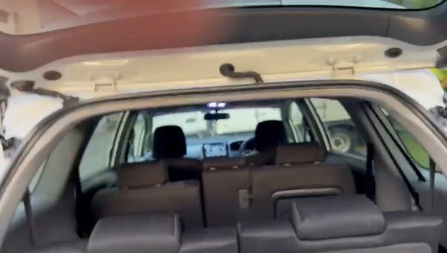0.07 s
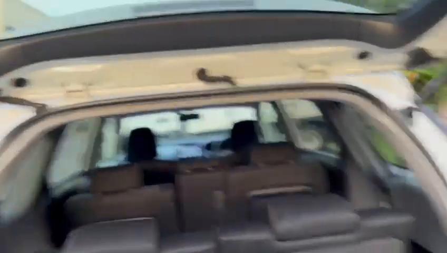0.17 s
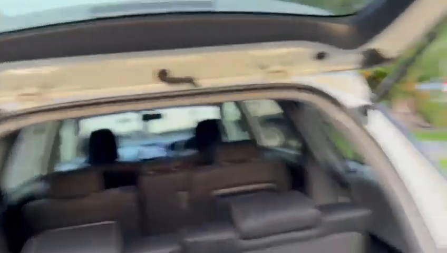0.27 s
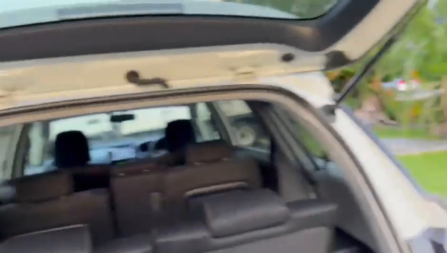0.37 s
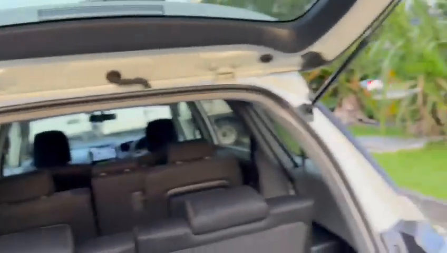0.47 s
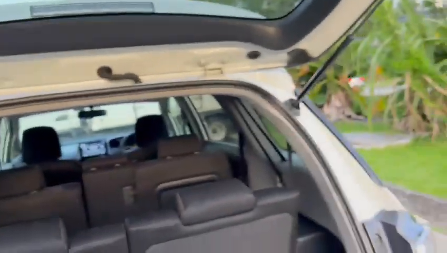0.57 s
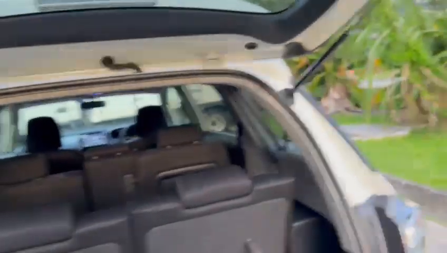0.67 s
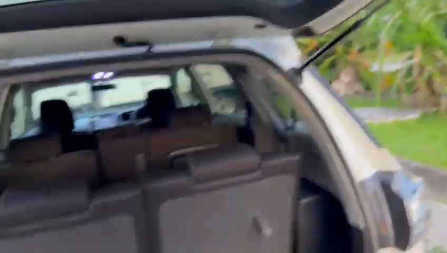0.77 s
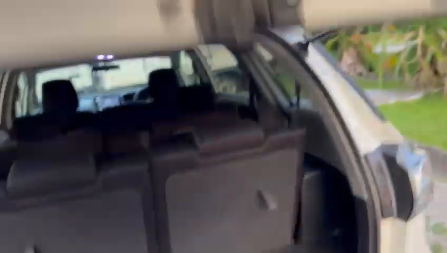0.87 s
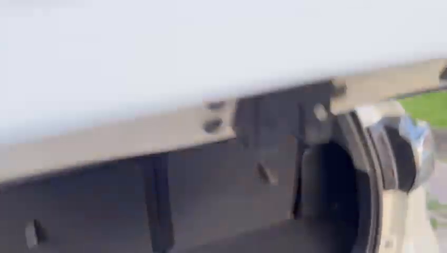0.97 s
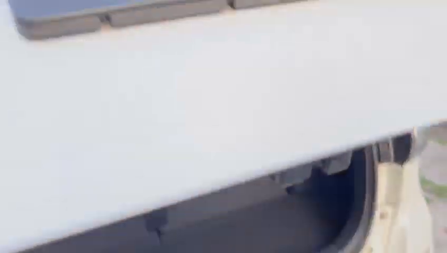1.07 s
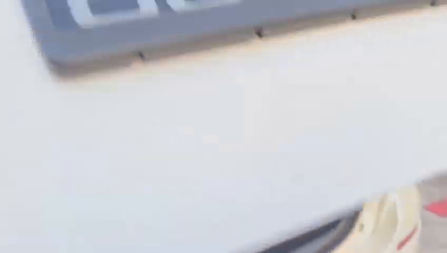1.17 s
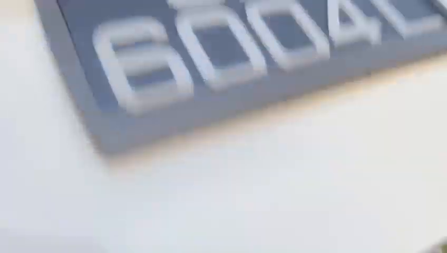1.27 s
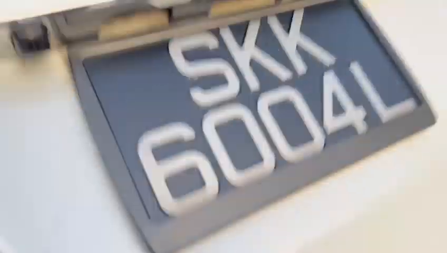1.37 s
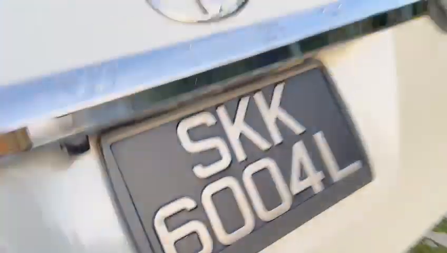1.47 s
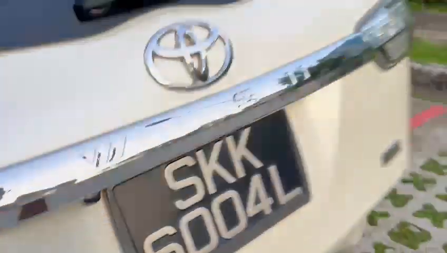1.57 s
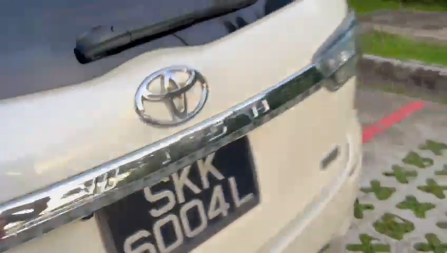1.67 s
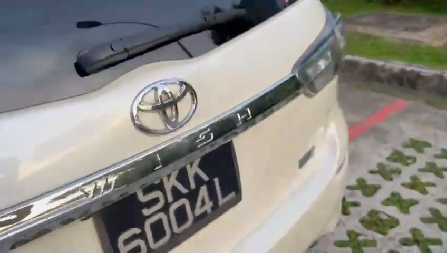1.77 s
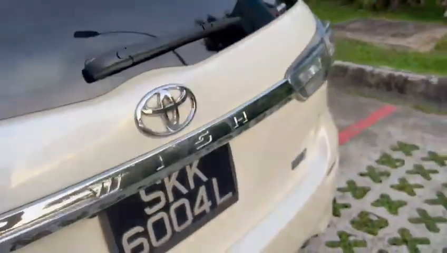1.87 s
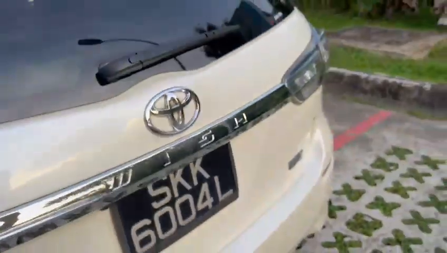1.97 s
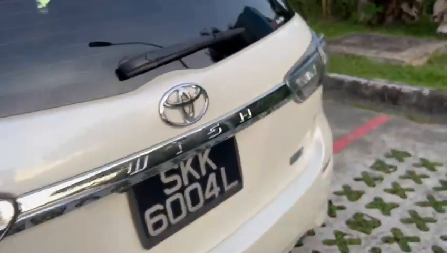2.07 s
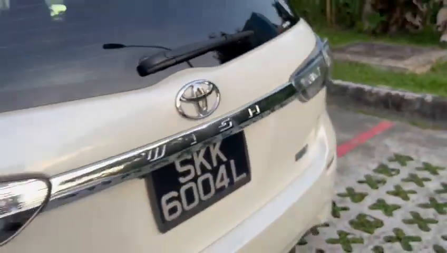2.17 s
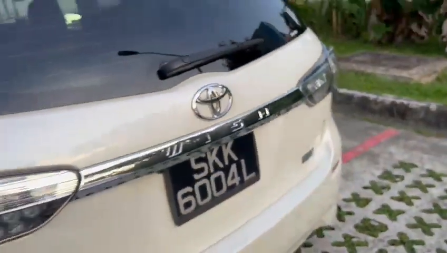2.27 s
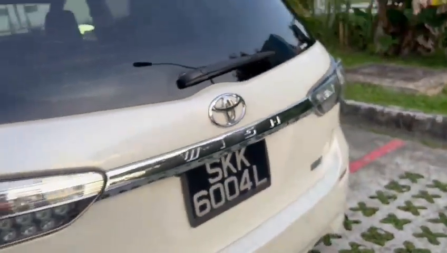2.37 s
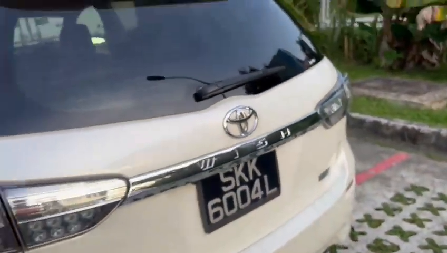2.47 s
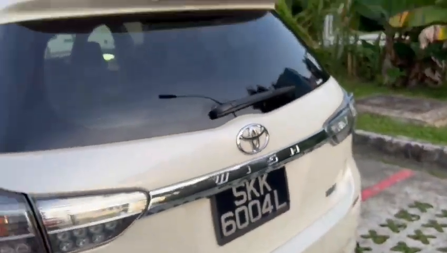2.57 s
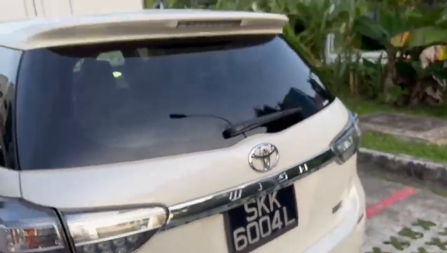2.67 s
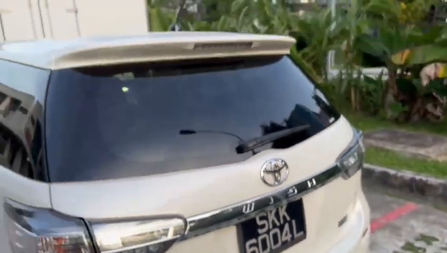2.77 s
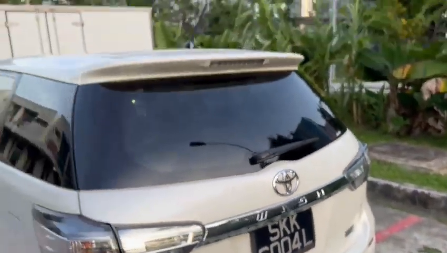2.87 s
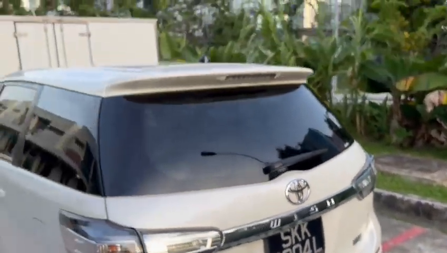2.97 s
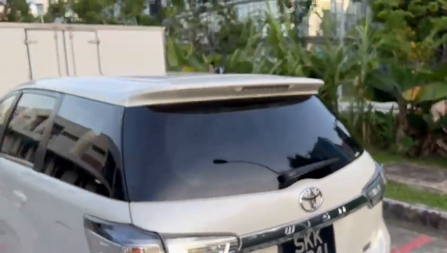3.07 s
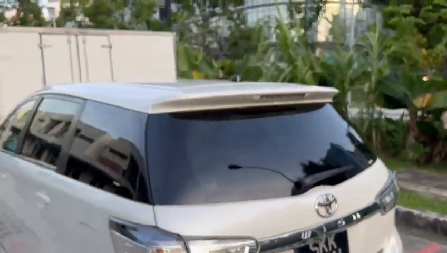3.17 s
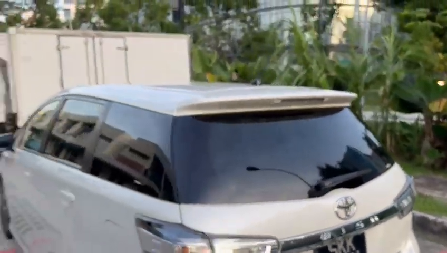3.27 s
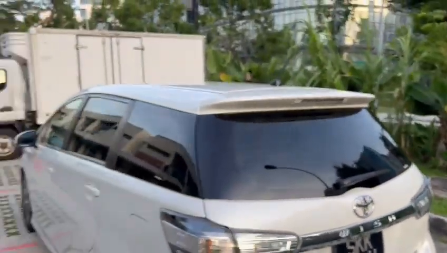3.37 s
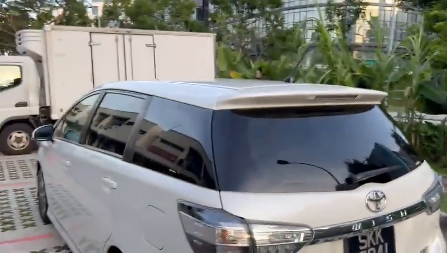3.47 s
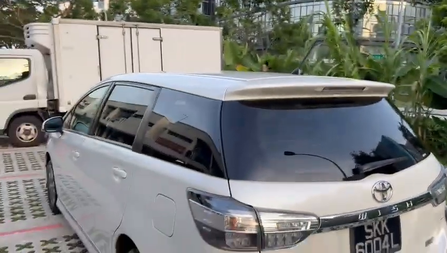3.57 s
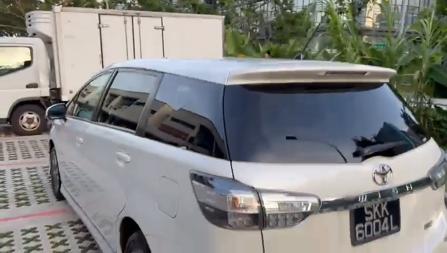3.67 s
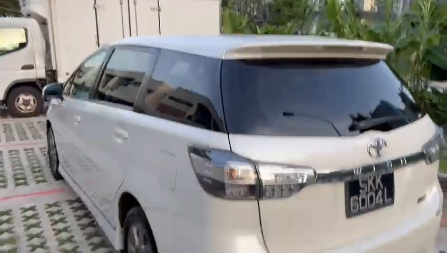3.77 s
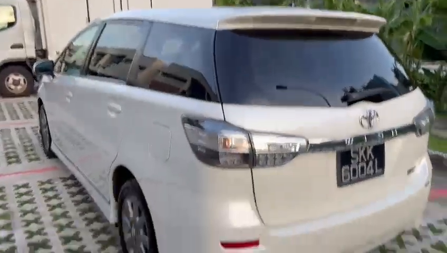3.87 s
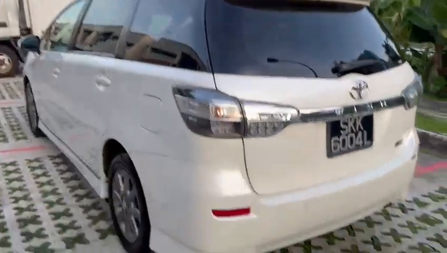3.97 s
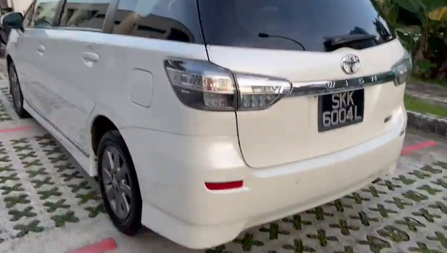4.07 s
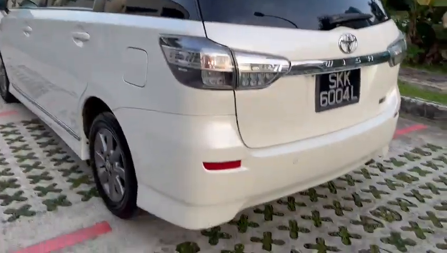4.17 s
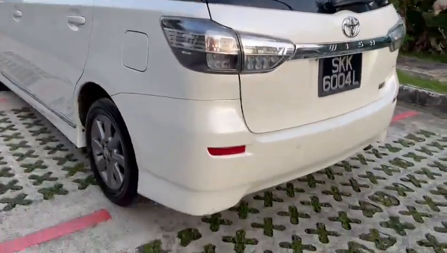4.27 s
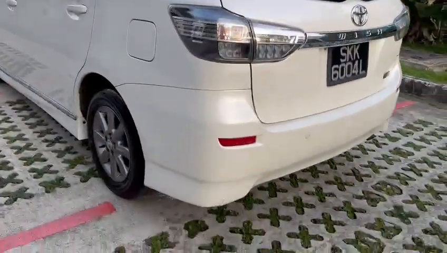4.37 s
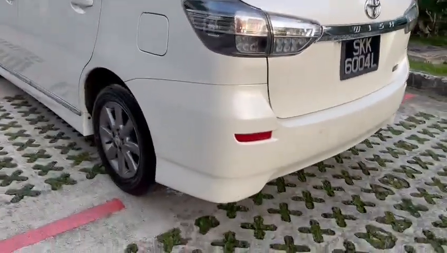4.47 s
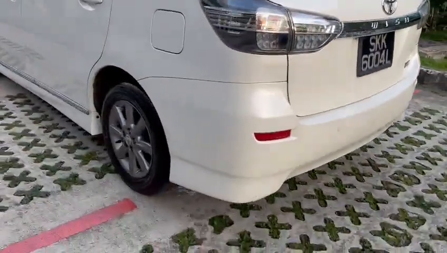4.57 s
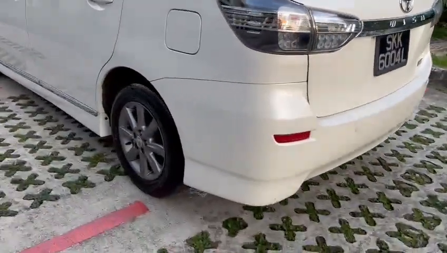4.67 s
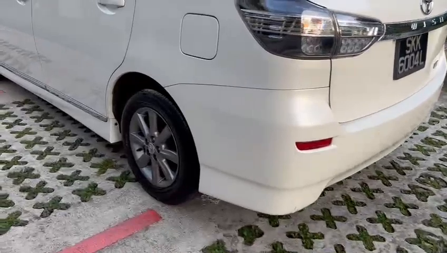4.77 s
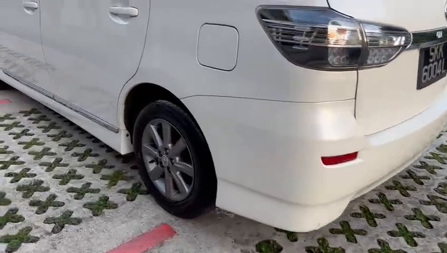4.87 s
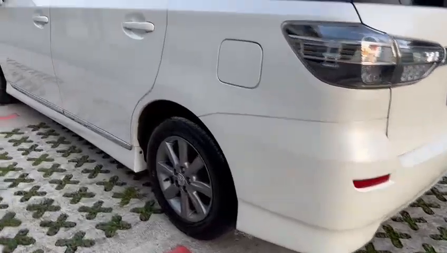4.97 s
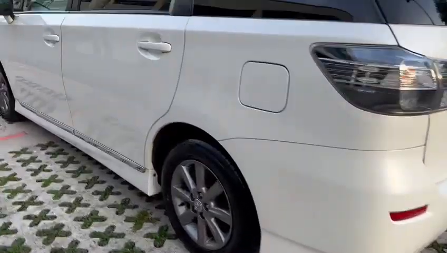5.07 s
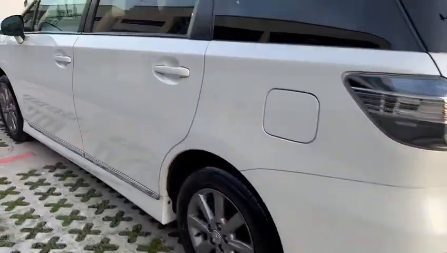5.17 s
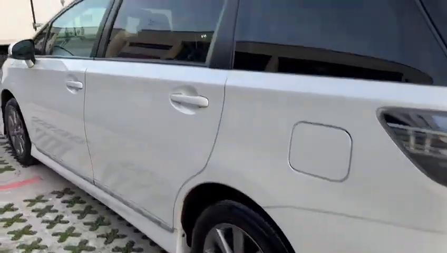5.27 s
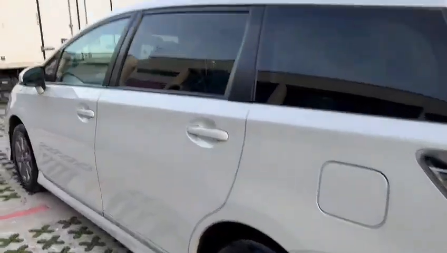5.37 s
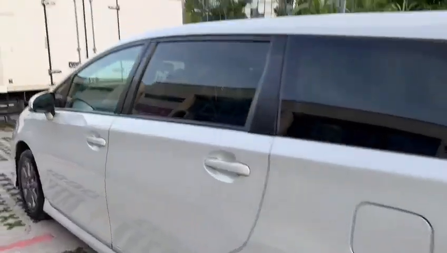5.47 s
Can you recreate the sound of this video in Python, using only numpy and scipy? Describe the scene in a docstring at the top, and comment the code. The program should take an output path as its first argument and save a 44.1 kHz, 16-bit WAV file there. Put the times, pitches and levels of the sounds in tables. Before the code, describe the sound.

Outdoors over distant traffic and idling machinery, handling clicks and a faint strut hiss lead to a heavy, rattling car hatch slam.

```python
"""In an open car park a low rough tone sinks away over distant traffic and the wavering hum of idling machinery.
Sleeve rustle (noise in strokes), small clicks (damped knocks) and soft bumps come from someone with the microphone.
A car's rear hatch is pulled down on whispering gas struts (gliding narrow noise and a high hiss), then slammed:
latch contacts ring the panel modes, noise shudders and clatters, a trim part bounces, cabin air booms.
The listener steps away meanwhile; clicks and bumps go on, and near the end a faint far tone whistles briefly."""
import sys
import numpy as np
from scipy import signal
from scipy.fft import rfft, irfft
from scipy.io import wavfile
from scipy.ndimage import uniform_filter1d

SR = 44100
rng = np.random.default_rng(int(sys.argv[2]) if len(sys.argv) > 2 else 0)


def wav_record(signal):
    """Record a signal, one row per channel, as 16-bit PCM in the file named by sys.argv[1]."""
    frames = np.transpose(np.atleast_2d(signal))
    bounded = np.clip(frames, -1, 1)
    # unit amplitude maps onto the largest positive 16-bit level
    quanta = np.round(bounded * 32767).astype(np.int16)
    wavfile.write(sys.argv[1], SR, quanta)


N = 243873

# Surroundings. Low rumble of the distance. Each row: time in seconds, level in dB.
RUMBLE_LEVEL = [(0, -35), (.85, -35), (1.15, -31.5), (2.0, -32), (2.96, -32.5), (3.3, -37.5), (3.67, -33.5),
                (4.2, -35.5), (5.53, -36)]
# Spectrum of the outdoor air sound. Each row: frequency in Hz, relative density in dB per Hz.
AIR_COLOUR = [(15, -49), (25, -10), (75, -1), (129, -5), (213, -9.5), (273, -10.5), (460, -19), (996, -24),
              (1450, -29), (2160, -34), (3290, -41.5), (6450, -45.5), (7870, -48.5), (8690, -51),
              (9600, -65.5), (12500, -113), (21100, -120)]
# Idling machinery. Each row: frequency in Hz, wander width in Hz, level in dB at the open hatch,
# level in dB out beside the car.
HUM_TONES = [(70, 4, -43, -43), (97.26, 2.78, -39.5, -37), (137, 2.23, -47.5, -36), (195.2, 4.87, -46, -49),
             (263.8, 1.12, -52, -45), (338.2, 2.3, -45.5, -52)]
# Microphone pair, diffuse sounds. Each row: frequency in Hz, left-right likeness 0-1, left over right in dB.
FAR_PAIR = [(60, 0.96, 2), (263, 0.83, 1.5), (430, 0.64, 2), (736, 0.2, 1.5), (1440, 0, -0.5),
            (2360, 0.39, -0.5), (3700, 0.22, 1.5), (4600, 0.32, 2), (6960, 0.34, 3), (8700, 0.3, -0.5)]
# Microphone pair, near sounds: the hatch and the rubbing of sleeve and hand. Each row: frequency in Hz, left-
# right likeness 0-1, left over right in dB, phase lead of the left in radians.
NEAR_PAIR = [(60, .99, 1, 0), (260, .94, 2.5, .2), (670, .7, 6, .6), (1150, .75, 5, .7), (1640, .7, 1, 3.3),
             (1980, .78, 1, 5.5), (2400, .65, 2, 6.9), (4500, .55, 3.5, 6.9), (6000, .2, 2, 7.5),
             (9000, .45, 1, 6.2)]
# Strokes of sleeve and hand. Each row: peak time in seconds, swell in seconds, fade in seconds,
# hiss level in dB, dull rubbing level in dB.
STROKES = [(.144, 0.037, 0.099, -54, -40.5), (.5, 0.065, 0.019, -80, -39), (.638, 0.14, 0.047, -57.5, -40),
           (.87, 0.26, 0.24, -60.5, -45), (1.045, 0.078, 0.12, -49, -34.5),
           (1.069, 0.026, 0.011, -41.5, -37), (1.33, 0.24, 0.17, -77, -59), (1.68, 0.08, 0.2, -61, -46)]
# Spectrum of cloth hiss. Each row: frequency in Hz, relative density in dB per Hz.
RUSTLE_COLOUR = [(1470, -32), (2500, -24), (2780, -10), (3990, -15.5), (5420, -9.5), (8930, -4),
                 (9740, -31), (10100, -71), (10800, -17), (11500, 9), (12300, -24), (16000, -58),
                 (22000, -120)]
# Small clicks and taps. Each row: start in seconds, knock level in dB, pitch in Hz, bright part level in dB,
# left over right in dB.
CLICKS = [(0.151, -35.5, 1360, -58, 14), (.386, -36, 1100, -63, -2), (0.483, -33, 2225, -37.5, 2),
          (0.484, -36, 1500, -46, 2), (0.485, -31, 1010, -50, 5), (0.492, -32, 840, -55, 6),
          (.494, -32, 490, -50, 2), (0.630, -37, 1100, -46, -3), (0.642, -36, 1046, -42.5, 1),
          (0.853, -28, 1250, -50, -1), (0.854, -26, 980, -55, -2), (0.855, -31, 720, -60, -1),
          (.985, -37, 1100, -60, -2), (1.019, -22.5, 400, -51, -3), (1.028, -22, 330, -60, 6),
          (1.040, -18, 390, -44, 4), (1.042, -40, 1950, -55, 2), (1.044, -28, 910, -61, 6),
          (1.068, -30, 334, -61, -2), (1.082, -29, 450, -63, 0), (1.094, -27, 380, -63, 4),
          (1.108, -30, 480, -65, 0), (1.578, -31, 775, -62, -2), (1.580, -33, 1010, -62, -5),
          (1.630, -49, 4500, -44, 3), (2.110, -36, 1050, -69, 1), (2.431, -41, 760, -65, -5),
          (3.545, -50, 3500, -48, 1), (3.552, -48, 4300, -48, 3), (3.560, -54, 3200, -52, 1)]
# Air hissing through the moving struts. Each row: start in seconds, end in seconds, level in dB.
STRUT_HISS = [(.78, 1.11, -62), (1.28, 1.45, -75)]
# Bumps carried to the microphone by hand and steps. Each row: time of the trough in seconds, peak in dB,
# frequency in Hz, length in seconds.
BUMPS = [(1.054, -12, 98, 0.0029), (1.13, -23, 83.5, 0.016), (1.168, -23.5, 90, 0.02),
         (1.375, -23, 70.5, 0.0065), (1.531, -23.5, 81.4, 0.028), (1.576, -17.5, 81.6, 0.013),
         (3.668, -19.5, 63.6, 0.014), (3.749, -17.5, 106, 0.0083)]
# Latch and seal contacts of the slam. Each row: time in seconds, relative strength in dB.
CONTACTS = [(1.7677, -20.5), (1.7696, -6), (1.775, -14), (1.7815, -7.5), (1.785, -21), (1.797, -24.5),
            (1.805, -10.5), (1.816, -12), (1.832, -24), (1.841, -14.5), (1.852, -18.5), (1.863, -13.5),
            (1.872, -17), (1.888, -23), (1.901, -19.5), (1.919, -23), (1.950, -30), (1.965, -29)]
# Modes of hatch and body, damped by seal and trim. Each row: frequency in Hz, relative level in dB,
# 60 dB decay time in seconds before the limits on ringing below.
PANEL_MODES = [(206, -9, 0.23), (238.4, -3.5, 0.2), (313, -5.5, 0.12), (369, -5, 0.12), (426, -8, 0.094),
               (481, -6, 0.13), (529, 1, 0.058), (613, -11.5, 0.22), (715, -9.5, 0.27), (864, -8.5, 0.11),
               (932, -10, 0.057), (1017, -13, .07), (1132, -10.5, 0.15), (1224, -13.5, 0.12),
               (1467, -7, 0.06), (1710, -10, 0.083), (1845, -7.5, 0.082), (2040, -13, 0.04),
               (2380, -21, 0.03)]
# Spectrum of the shudder. Each row: frequency in Hz, relative density in dB per Hz.
SHUDDER_COLOUR = [(60, -20), (110, 0), (350, -3), (700, -12), (1200, -17), (1500, -18), (2000, -17),
                  (3000, -20.5), (5200, -24), (8500, -33), (9700, -46), (10700, -43), (11500, -25),
                  (12300, -38)]
# Dull, middle and bright part of the shudder. Each row: hold level in dB, hold in seconds, fall in dB per second.
SHUDDER_PARTS = [(-21, 0.14, 181), (-28.5, 0.1, 180), (-29.5, 0.09, 161)]
# Bounces of a loose trim part. Each row: start in seconds, relative level in dB.
BOUNCES = [(1.782, -28), (1.791, -29), (1.800, -28), (1.838, -28), (1.895, -36), (1.944, -43), (1.950, -44),
           (1.992, -47), (2.036, -48)]
# Cabin air squeezed as the seal closes. Each row: start in seconds, level in dB, frequency in Hz,
# 60 dB decay time in seconds.
BOOM = [(1.770, -24, 75, 0.15), (1.790, -22, 27, 0.3), (1.800, -20.5, 118, 0.66), (1.803, -19.5, 162, .6),
        (1.9, -26, 107, .5), (1.794, -8.5, 58.6, 0.54), (1.797, -12.5, 67, 0.39), (1.801, -18, 89.8, 0.98),
        (2.1, -39, 27, 0.24)]

SINK_END_S, SINK_START_HZ, SINK_END_HZ, SINK_DB = 0.29, 420, 343, -45
WASH_DB = -40.5   # steady traffic wash
HUM_WAVER_DB = 1.6
WALK_FROM_S, WALK_TO_S = 0.94, 3.34   # the listener steps away from the hatch
STROKE_DROP_DB = 20   # swell and fade times span this many dB
RUSTLE_REST_DB, RUBBING_REST_DB = -73, -51   # between strokes, until the slam
SCUFF_DB = -9   # the rubbing's middle part, against its dull part
SCUFF_LIMIT_DB = -44   # the dull part drives the scuff no higher than this
CLICK_T60_S, CLICK_T60_SLOPE = 0.036, 0.15   # ring time at 1 kHz; lower clicks ring longer by this power
STRUT_FROM_S, STRUT_TO_S, STRUT_EDGE_S = 0.78, 1.02, 0.02
STRUT_START_HZ, STRUT_END_HZ, STRUT_WIDTH_HZ = 1440, 950, 130
STRUT_DB, STRUT_FLUTTER_DB = -52, 3
STRUT_HISS_HZ, STRUT_HISS_EDGE_S = (4860, 6230), 0.04
DETUNE = 0.04   # spread of mode shifts as a share of pitch; each contact loads the panels differently
PANEL_DB = -5   # all panel modes together
LONGEST_RING_S, LONGEST_RING_CYCLES = 0.2, 90   # high modes are damped sooner
SHUDDER_ATTACK_S = 0.005
ROCK_HZ, ROCK_DB = 20.5, 2.5   # the hatch rocks on its seal, so the chatter swells and sinks
ROCK_PEAK_S = 0.032   # first swell after the first contact
CHATTER_PER_S, CHATTER_T60_S, CHATTER_SHARE = 900, 0.006, 0.5   # tiny rattles within the shudder
CLATTER_PER_S, CLATTER_DB, CLATTER_T60_S = 350, -2.5, 0.05   # loose parts; level against the middle shudder
BOUNCE_ATTACK_S = 0.0015   # half of the smoothing span
WHISTLE_S, WHISTLE_LENGTH_S, WHISTLE_EDGE_S, WHISTLE_HZ, WHISTLE_DB = 4.795, 0.14, 0.015, 1930, -62
CUTOFF_HZ = 12800


def from_db(db):
    """Logarithmic level: decibels become an amplitude ratio."""
    return 10 ** (np.asarray(db) / 20)


def rms_one(x):
    """Normalisation: scale to a root mean square of 1."""
    return x / np.sqrt(np.mean(x ** 2) + 1e-20)


def in_time(rows):
    """Linear interpolation: columns of a level curve at every sample, -120 dB outside it."""
    s, *columns = np.transpose(rows)
    return [np.interp(np.arange(N) / SR, s, c, left=-120, right=-120) for c in columns]


def in_hz(rows):
    """Interpolation over log frequency: columns of a table at every FFT bin."""
    hz, *columns = np.transpose(rows)
    log_hz = np.log(np.fft.rfftfreq(N, 1 / SR) + 1)
    return [np.interp(log_hz, np.log(hz), c) for c in columns]


def band(x, low_hz, high_hz):
    """Band-pass filtering, scaled to rms 1."""
    sos = signal.butter(2, [low_hz, high_hz], "band", fs=SR, output="sos")
    return rms_one(signal.sosfilt(sos, x))


def drift(rate_hz):
    """Low-pass random fluctuation of rms 1, computed at every 40th sample and interpolated."""
    r = np.exp(-80 * np.pi * rate_hz / SR)
    white = rng.standard_normal(N // 40 + 2002)
    slow = signal.lfilter([1], [1, -2 * r, r * r], white)[2000:]   # drop the filter's start
    return np.interp(np.arange(N) / 40, np.arange(len(slow)), rms_one(slow))


def decay(t60):
    """Exponential damping: gain per sample for a 60 dB fall in t60 seconds."""
    return from_db(-60 / (t60 * SR))


def ring(clicks, hz, t60):
    """Damped resonator: a unit click starts a decaying sine of initial height 1."""
    r = decay(max(t60, .002))
    w = 2 * np.pi * hz / SR
    return signal.lfilter([0, np.sin(w)], [1, -2 * r * np.cos(w), r * r], clicks + 1e-18)


def clicks_at(times, sizes):
    """Impulse train: single samples of given sizes."""
    out = np.zeros(N)
    out[np.round(np.asarray(times) * SR).astype(int)] = sizes
    return out


def fade(times, level_db, t60):
    """Exponential decay: envelopes that jump up at each time and die away."""
    return signal.lfilter([1], [1, -decay(t60)], clicks_at(times, from_db(level_db)) + 1e-18)


def gate(t, start, end, edge_s):
    """Trapezoid envelope: straight rise and fall at the edges of a time span."""
    return np.clip(np.minimum(t - start, end - t) / edge_s, 0, 1)


def pair(shared, own, ports, colour=None):
    """Partial coherence: right hears the left's sound turned in phase, mixed with a sound of its own."""
    alike, balance_db, *lead = in_hz(ports)
    alike = np.clip(alike, 0, 1)
    left = rfft(shared)
    turn = np.exp(-1j * (lead[0] if lead else 0))
    right = alike * left * turn + np.sqrt(1 - alike ** 2) * rfft(own)
    gain = from_db(in_hz(colour)[0]) if colour else 1
    both = np.array([left * from_db(balance_db / 2), right * from_db(-balance_db / 2)])
    return irfft(gain * both, N)


def noise_pair(ports, colour):
    """Spectral shaping: partly coherent stereo noise, white when no colour is given."""
    return pair(*rng.standard_normal((2, N)), ports, colour)


def sinking_tone():
    """Frequency glide: a wavering low tone slides down and dies out."""
    t = np.arange(N) / SR
    hz = np.interp(t, [0, SINK_END_S], [SINK_START_HZ, SINK_END_HZ]) + 8 * drift(25)
    shape = np.sqrt(np.clip(1 - t / SINK_END_S, 0, 1)) * from_db(SINK_DB + 2.7 * drift(23))
    return np.sqrt(2) * shape * np.sin(2 * np.pi * np.cumsum(hz) / SR)


def surroundings():
    """Sum of many distant sources: noise whose bands swell partly together, partly in their own way."""
    rumble_db, = in_time(RUMBLE_LEVEL)
    spectrum = rfft(noise_pair(FAR_PAIR, AIR_COLOUR))
    hz = np.fft.rfftfreq(N, 1 / SR)
    edges = [0, 200, 400, 800, 1600, 3200, 6400, SR / 2]
    together = drift(4)
    parts = []
    for low, high in zip(edges, edges[1:]):
        part = irfft(spectrum * (hz >= low) * (hz < high), N)
        parts.append(part * from_db(.6 * together + 1.1 * drift(6)))
    rumble = from_db(rumble_db) * rms_one(parts[0])
    wash = from_db(WASH_DB) * rms_one(sum(parts[1:]))
    return rumble + wash


def hum():
    """Frequency and amplitude modulation: tones wander in pitch and waver, levels shift as the listener walks."""
    out = 0
    away = np.interp(np.arange(N) / SR, [WALK_FROM_S, WALK_TO_S], [0, 1])
    for hz, width_hz, near_db, away_db in HUM_TONES:
        wandering_hz = hz + width_hz / 2 * drift(2.75)
        phase = 2 * np.pi * (np.cumsum(wandering_hz) / SR + rng.random())
        level_db = near_db + (away_db - near_db) * away + HUM_WAVER_DB * drift(3.8)
        out = out + np.sqrt(2) * from_db(level_db) * np.sin(phase)
    return out * from_db([[1.1], [-1.1]])   # a little stronger on the left


def rustle():
    """Friction noise: cloth and hand give grainy hiss and dull rubbing in strokes over a quiet rest level."""
    t = np.arange(N) / SR
    before = t < CONTACTS[0][0]   # all rustle stops at the slam
    hiss_gain = from_db(RUSTLE_REST_DB) * before
    rub_gain = from_db(RUBBING_REST_DB) * before
    for s, swell, fading, hiss_db, rub_db in STROKES:
        shape = before * from_db(-STROKE_DROP_DB * np.maximum((s - t) / swell, (t - s) / fading))
        hiss_gain = hiss_gain + from_db(hiss_db) * shape
        rub_gain = rub_gain + from_db(rub_db) * shape
    hiss = rms_one(noise_pair(FAR_PAIR, RUSTLE_COLOUR)) * hiss_gain * from_db(3.4 * drift(35))
    rub = band(noise_pair(NEAR_PAIR, None), 170, 454) * rub_gain * from_db(2.0 * drift(28))
    scuff_gain = np.minimum(rub_gain, from_db(SCUFF_LIMIT_DB)) * from_db(SCUFF_DB + 3.6 * drift(28))
    scuff = band(noise_pair(FAR_PAIR, None), 710, 1770) * scuff_gain
    return hiss + rub + scuff


def small_clicks():
    """Impact excitation: a short rough knock around its pitch with a bright tick on top."""
    out = np.zeros((2, N))
    white = rng.standard_normal((2, N))
    noise = white[0] + white[1] * [[1], [-1]]
    tick = band(signal.lfilter([1], [1, -.8], noise), 1500, 6300)
    t = np.arange(SR // 5) / SR
    for s, level_db, hz, bright_db, pan_db in CLICKS:
        at = round(s * SR)
        span = slice(at, at + SR // 5)
        t60 = CLICK_T60_S * (hz / 1e3) ** -CLICK_T60_SLOPE
        low_hz, high_hz = hz / 1.5, hz * 1.4
        rough = band(band(noise[:, span], low_hz, high_hz), low_hz, high_hz)
        body = .85 * np.sin(2 * np.pi * hz * t) + .4 * rough
        knock = from_db(level_db) * body + from_db(bright_db) * tick[:, span]
        shape = (1 - np.exp(-t / .0008)) * from_db(-60 * t / t60)
        out[:, span] += knock * shape * from_db([[pan_db / 2], [-pan_db / 2]])
    return signal.sosfilt(signal.butter(8, 9000, fs=SR, output="sos"), out)


def strut_whisper():
    """Narrow-band noise: slow noise modulates a gliding carrier as the gas struts let the hatch swing down."""
    t = np.arange(N) / SR
    shape = gate(t, STRUT_FROM_S, STRUT_TO_S, STRUT_EDGE_S)
    hz = np.interp(t, [STRUT_FROM_S, STRUT_TO_S], [STRUT_START_HZ, STRUT_END_HZ])
    phase = 2 * np.pi * np.cumsum(hz) / SR
    whisper = drift(STRUT_WIDTH_HZ) * np.cos(phase) + drift(STRUT_WIDTH_HZ) * np.sin(phase)
    return from_db(STRUT_DB + STRUT_FLUTTER_DB * drift(12)) * shape * whisper


def strut_hiss():
    """Flow noise: air through the struts gives a fluttering band high up."""
    t = np.arange(N) / SR
    shape = sum(from_db(level_db) * gate(t, start, end, STRUT_HISS_EDGE_S) for start, end, level_db in STRUT_HISS)
    air = band(band(noise_pair(NEAR_PAIR, None), *STRUT_HISS_HZ), *STRUT_HISS_HZ)
    return air * shape * from_db(1.2 * drift(30))


def bumps():
    """Transient low-frequency pressure: short cosines around a trough, under a bell-shaped envelope."""
    t = np.arange(N) / SR
    return sum(-from_db(peak_db) * np.cos(2 * np.pi * hz * (t - s)) * np.exp(-((t - s) / length) ** 2)
               for s, peak_db, hz, length in BUMPS)


def panel(strikes, shifts):
    """Modal superposition: every contact excites every mode with its own strength, sign and detuning."""
    out = np.zeros(N)
    t = np.arange(SR // 4)[:, None] / SR
    hz, mode_db, t60 = np.transpose(PANEL_MODES)
    t60 = np.clip(t60, .002, np.minimum(LONGEST_RING_S, LONGEST_RING_CYCLES / hz))
    dying = from_db(mode_db + PANEL_DB - 60 * t / t60)
    for (s, strength_db), strike, shift in zip(CONTACTS, strikes, shifts):
        modes = np.sin(2 * np.pi * hz * (1 + DETUNE * shift) * t) * dying
        out[round(s * SR):][:len(t)] += from_db(strength_db) * modes @ np.tanh(3 * strike)
    return out


def panel_rings():
    """Structural resonance: two sets of struck modes make the partly coherent pair."""
    draws = rng.standard_normal((2, 2, len(CONTACTS), len(PANEL_MODES)))
    return pair(*(panel(strikes, shifts) for strikes, shifts in draws), NEAR_PAIR)


def evened(x, span_s):
    """Envelope compression: dense contacts keep a steadier level than plain noise."""
    power = uniform_filter1d(np.mean(x ** 2, axis=0), int(span_s * SR))
    return rms_one(x / np.sqrt(power + 0.037))


def shudder_noise():
    """Band division: dull, middle and bright noise of dense contacts."""
    grain = noise_pair(NEAR_PAIR, SHUDDER_COLOUR)
    dull = evened(band(grain, 120, 600), .012)
    middle = evened(band(grain, 550, 3200), .006)
    bright = evened(band(grain, 2300, 12500), .003)
    return dull, middle, bright


def shudder_levels():
    """Attack, hold and linear fall in dB of each part, with the rocking as a sinusoidal level."""
    t = np.arange(N) / SR - CONTACTS[0][0]
    attack_db = 20 * np.log10(np.clip(t / SHUDDER_ATTACK_S + .5, 1e-6, 1))
    levels = [attack_db + hold_db - fall_db * np.maximum(t - hold_s, 0) for hold_db, hold_s, fall_db in SHUDDER_PARTS]
    return levels, ROCK_DB * np.cos(2 * np.pi * ROCK_HZ * (t - ROCK_PEAK_S))


def rattles():
    """Random point process: many tiny decaying contacts form an uneven envelope of rms 1."""
    born = (rng.random(N) < CHATTER_PER_S / SR) * rng.exponential(1, N)
    grains = signal.lfilter([1], [1, -decay(CHATTER_T60_S)], born)
    return rms_one(1 - CHATTER_SHARE + CHATTER_SHARE * rms_one(grains))


def clatter(level_db):
    """Random excitation of modes: small taps, partly different left and right, briefly ring the upper panel."""
    taps = (rng.random((2, N)) < CLATTER_PER_S / SR) * rng.exponential(1, (2, N))
    rings = 0
    for hz, mode_db, _ in PANEL_MODES:
        if hz > 450:
            signed_taps = taps * rng.standard_normal((2, N))
            rings = rings + from_db(mode_db / 2) * ring(signed_taps, hz, CLATTER_T60_S)
    return pair(*(rms_one(rings) * from_db(level_db + CLATTER_DB)), NEAR_PAIR)


def contact_cracks(middle, bright):
    """Impulsive contact: each latch or seal contact is a fast-decaying burst of noise."""
    s, strength_db = np.transpose(CONTACTS)
    return (middle + 0.28 * bright) * fade(s, strength_db - 10, 0.04)


def trim_bounces(bright):
    """Repeated impact: a loose trim part gives bursts of high noise with softened attacks."""
    s, level_db = np.transpose(BOUNCES)
    shape = uniform_filter1d(fade(s + BOUNCE_ATTACK_S, level_db, .05), int(2 * BOUNCE_ATTACK_S * SR))
    return band(band(bright, 4800, 12000), 4800, 8500) * shape


def cabin_boom():
    """Cavity resonance: squeezed cabin air sounds as low damped sines, slightly stronger on the left."""
    boom = sum(ring(clicks_at([s], from_db(level_db)), hz, t60) for s, level_db, hz, t60 in BOOM)
    return boom * from_db([[.5], [-.5]])


def slam():
    """Superposition: panel rings, shudder, clatter, contact cracks, trim bounces and cabin boom add up."""
    dull, middle, bright = shudder_noise()
    (dull_db, middle_db, bright_db), rock_db = shudder_levels()
    chatter = from_db(rock_db) * rattles()   # many small contacts make the shudder uneven
    shudder = from_db(dull_db) * dull
    shudder = shudder + chatter * (from_db(middle_db) * middle + from_db(bright_db) * bright)
    loose = clatter(middle_db + rock_db)
    return panel_rings() + shudder + loose + contact_cracks(middle, bright) + trim_bounces(bright) + cabin_boom()


def whistle():
    """Near-pure tone: a short, slightly wavering sine, faint as from far away."""
    t = np.arange(N) / SR
    shape = gate(t - WHISTLE_S, 0, WHISTLE_LENGTH_S, WHISTLE_EDGE_S) * from_db(WHISTLE_DB + 1.2 * drift(25))
    hz = WHISTLE_HZ + 8 * drift(15)
    return np.sqrt(2) * shape * np.sin(2 * np.pi * np.cumsum(hz) / SR)


def scene():
    """Linear superposition: all sources add at the microphone pair."""
    background = sinking_tone() + surroundings() + hum()
    handling = rustle() + small_clicks() + bumps()
    hatch = strut_whisper() + strut_hiss() + slam()
    return background + handling + hatch + whistle()


def record(dry):
    """Band limiting and soft saturation: lowest bass is cut, the loudest peaks are rounded, the top is cut."""
    low_cut = signal.sosfilt(signal.butter(2, 25, "high", fs=SR, output="sos"), dry)
    rounded = low_cut / (1 + np.abs(low_cut / .95) ** 4) ** .25
    return signal.sosfilt(signal.cheby2(12, 70, CUTOFF_HZ, fs=SR, output="sos"), rounded)


dry = scene()
out = record(dry)
wav_record(out)
```